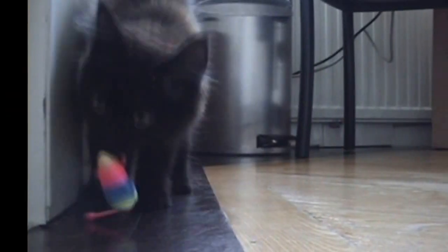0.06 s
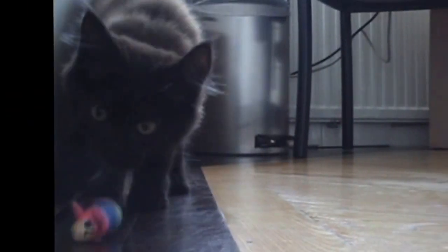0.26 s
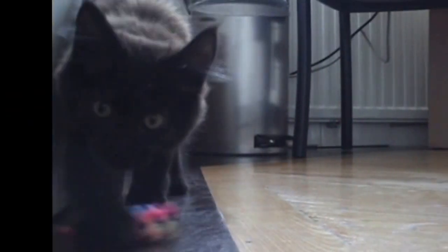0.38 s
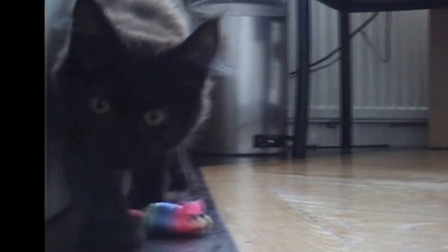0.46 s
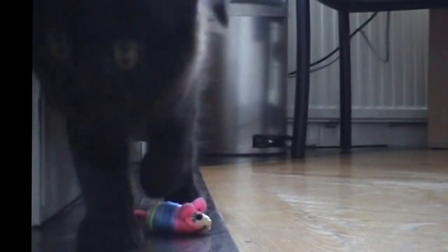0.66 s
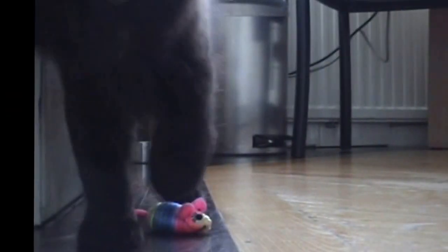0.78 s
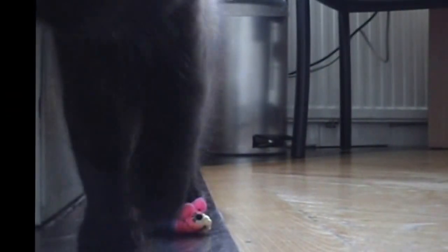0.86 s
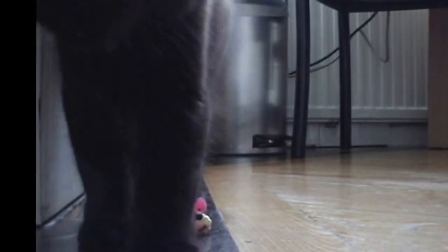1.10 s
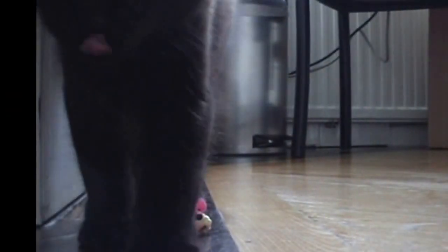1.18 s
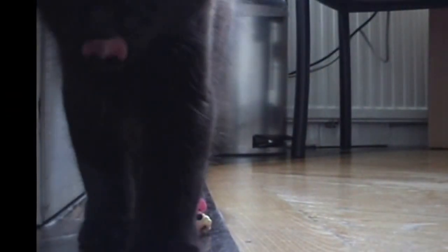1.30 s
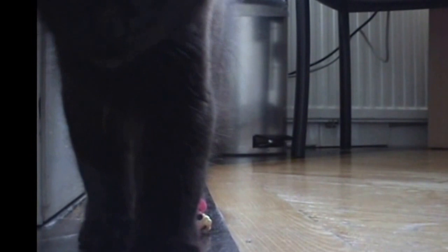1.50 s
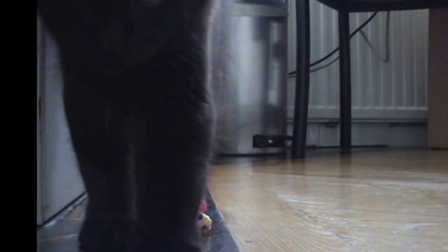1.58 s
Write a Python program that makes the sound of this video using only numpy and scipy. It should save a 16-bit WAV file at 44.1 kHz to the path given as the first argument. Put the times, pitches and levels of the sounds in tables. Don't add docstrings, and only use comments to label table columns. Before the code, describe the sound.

Close to a small hissy microphone, a kitten's plastic bead toy rattles, knocks hard on wood, knocks harder again, scuffs and rolls to rest; afterwards only low wavering hum, faint buzz and barely audible fur brushes.

```python
import sys
import numpy as np
from scipy import signal
from scipy.fft import rfft, irfft
from scipy.io import wavfile
from scipy.ndimage import uniform_filter1d

SR = 44100
rng = np.random.default_rng(int(sys.argv[2]) if len(sys.argv) > 2 else 0)


def decibels_to_gain(level_db):
    exponent = np.asarray(level_db, float) / 20
    return 10 ** exponent


def dump_mix(stems):
    frames = np.atleast_2d(stems).T
    limited = np.clip(frames, -1, 1)
    pcm = np.round(limited * 32767).astype(np.int16)
    wavfile.write(sys.argv[1], SR, pcm)


N = 72765

# pitch_hz, level_db, waver_hz
HUM_TONES = [(49.7, -52, 0.13), (99.74, -53.5, 0.5), (146, -52.5, 1.85), (179.7, -43, 0.29),
             (235.9, -49.5, 5.05), (268, -54, 4.66), (294.4, -54.5, 4.87)]
# time_s, level_db
MAINS_BEAT = [(0, -11), (.06, 1), (.36, 10), (.46, -7), (.8, 5), (1.06, 5.5), (1.3, 3.5), (1.54, -18),
              (1.65, 5)]
# pitch_hz, level_db
BUZZ_SPECTRUM = [(1500, -100), (2900, -92), (4500, -84), (7000, -91), (8700, -107), (11000, -99.5),
                 (14000, -105)]
# pitch_hz, level_db
AIR_SPECTRUM = [(25, -20), (70, -15.5), (160, -2.5), (250, -2), (420, -9), (900, -14.5), (1500, -22),
                (3000, -45)]
# pitch_hz, level_db
HISS_SPECTRUM = [(500, -7), (2000, 9), (4500, 2.5), (7500, -3.5), (10000, -5.5), (12000, -21), (14000, -45),
                 (15700, -27)]
# pitch_hz, likeness_ratio
PORT_LIKENESS = [(60, 0.57), (150, 0.82), (380, 0.73), (950, 0.44), (2380, 0.25), (5980, 0.41),
                 (15000, 0.39)]
# pitch_hz, left_over_right_db
DIFFUSE_LEAN = [(60, -11), (150, 2.5), (380, -2.5), (950, -3.5), (2380, -1), (5980, 0), (15000, -2)]
# time_s, level_db
SLIDE_LEVEL = [(0, -55.5), (.205, -48), (.23, -46.5), (.31, -52), (.45, -46.5), (.57, -52.5), (0.678, -62),
               (0.899, -69), (1.65, -67)]
# pitch_hz, level_db
SLIDE_SPECTRUM = [(200, -9), (500, -0.5), (1000, 0), (2500, -9.5), (5000, -17.5), (9000, -21), (14000, -32)]
# start_s, peak_db, ring_hz
EDGE_SCUFFS = [(.013, -30.5, 568), (.344, -24, 620), (.385, -32, 1650), (.4645, -29.5, 516),
               (.4675, -29.5, 848), (.5285, -32.5, 790), (.534, -35, 1005), (.5385, -40, 694),
               (.543, -36, 517), (.5515, -41.5, 1040), (.5455, -29, 832), (.5495, -34.5, 910),
               (.554, -34, 696), (.562, -31, 480)]
# start_s, belly_db, ring_db, flank_db, tip_db
BEAD_STRIKES = [(0.0579, -43.5, -35, -36, -44.5), (0.0779, -65, -55, -53, -56),
                (0.1049, -43, -48, -35.5, -37), (0.1124, -54, -53, -47, -50),
                (0.1259, -44, -52, -38, -45.5), (0.1537, -51, -50.5, -50.5, -53.5),
                (0.1573, -58, -50, -66, -61), (0.1673, -58, -46, -49, -47), (0.1704, -46, -46, -45, -47),
                (0.2151, -44, -40, -44, -41), (0.2229, -34.5, -35, -33.5, -33.5),
                (0.2309, -62, -65, -50, -50), (0.2336, -62, -52, -47, -49), (0.2532, -53, -44, -48, -62),
                (0.267, -39, -38, -42, -45), (0.2698, -38.5, -40, -36, -40),
                (0.2751, -46, -35.5, -41, -37), (0.2806, -62, -62, -56, -54),
                (0.2833, -61, -63, -59, -57), (0.3001, -47, -37, -41, -36),
                (0.3045, -28.5, -40, -32, -26), (0.3067, -38, -23.5, -25.5, -25),
                (0.3124, -37.5, -34.5, -35, -33.5), (0.3337, -52, -60, -39, -40),
                (0.3729, -35, -30.5, -30, -40), (0.3752, -47, -44, -42, -46),
                (0.3879, -43, -51, -51, -54),
                (0.4182, -53, -43, -43, -40), (0.428, -48, -47, -42, -60), (0.4323, -41, -45, -40, -46),
                  (0.446, -46, -45, -50, -51), (0.4535, -60, -49, -51, -51), (0.4564, -50, -52, -62, -61),
                  (0.4705, -45, -58, -62, -66), (0.477, -50, -57, -58, -62), (0.4972, -45, -52, -63, -64),
                  (0.5168, -53, -48, -39, -54), (0.5299, -50, -57, -34, -48), (0.5313, -48, -55, -48, -59),
                  (0.538, -53, -51, -49, -59), (0.5512, -57, -49, -48, -61), (0.5837, -49, -43, -48, -56),
                  (0.5884, -62, -50, -53, -57.5), (0.5959, -52, -41, -37, -46),
                  (0.6077, -59, -49, -45, -56), (0.6144, -42, -46, -48, -50), (0.6295, -55, -55, -65, -64),
                  (0.6392, -51, -46, -44, -45), (0.6417, -47, -48, -54, -47),
                  (0.6552, -67.5, -62, -58.5, -59), (0.6631, -62, -50, -46, -55),
                  (0.6963, -64, -54, -62, -65), (1.27, -62, -61, -68, -43.5),
                  (1.3573, -50, -56, -62, -53.5)]
# pitch_hz, level_db, t60_s
SHELL_MODES = [(2790, -4.5, 0.0033), (3840, -2.5, 0.0018), (4960, -3.5, 0.0043), (6250, -3, 0.0023),
               (7720, -2.5, 0.0031), (8560, -2.5, 0.0027), (9630, -5.5, 0.0023), (10900, -13.5, 0.0028)]
SHELL_PART_HZ = [3900, 4960, 6300, 8400]
# start_s, peak_db, hardness_db, hollow_ring_db
LANDINGS = [(0.213, -8, -4, -8), (0.2188, -26, 3.5, 0), (0.2338, -29, 6, 4), (0.2543, -32, -5, 0),
            (0.2652, -29, -5, 0), (0.3024, -0.5, 1.5, 6.5), (.308, -21.5, 4, -4), (0.3517, -24, 0.5, 10),
            (0.3626, -11, 0.5, 2), (0.3672, -29, 0, 3), (0.3839, -19.5, 7, 2.5), (.397, -29.5, -4, 2),
            (0.4223, -26.5, 7.5, 0), (0.5294, -33, 5, 0)]
# pitch_hz, level_db, t60_s, signed_gain_ratio
BOARD_MODES = [(210, -20, 0.11, -0.83), (382.5, 3.5, 0.024, 0.98), (523, -25.5, 0.019, -4.5),
               (620, -14.5, 0.056, 0.91), (658, -24, 0.031, 0.55), (965, -15.5, 0.026, -0.5),
               (1330, -23.5, 0.016, 0.94), (2035, -23, 0.0069, 1.5)]
# centre_s, length_s, level_db, centre_hz
FUR_RUSTLES = [
    (0.803, 0.023, -57.5, 4800),
    (1.21, 0.035, -58, 3820),
    (1.414, 0.061, -60, 4300),
    (1.524, 0.028, -57, 4200),
    (1.624, 0.041, -59, 4000),
]
# pitch_hz, t60_s
ROOM_DECAY = [(120, 0.98), (300, 0.32), (800, 0.14), (2000, 0.074), (5000, 0.13), (10000, 0.21)]
# pitch_hz, level_db
ROOM_COLOUR = [(120, 3.5), (230, -4), (390, -5.5), (650, 0.5), (2000, 10.5), (10000, -5)]
# pitch_hz, left_over_right_db
KNOCK_DIRECTION = [(300, -1.3), (600, -3.1), (1200, -0.86), (2500, 0.7)]
# pitch_hz, left_over_right_db
BEAD_DIRECTION = [(3000, 3), (5500, 6.5), (7500, 1), (9000, 2)]


def evened(x):
    return x / np.sqrt(np.mean(x ** 2) + 1e-20)


def read(points, hz):
    f, value = np.transpose(points)
    return np.interp(np.log(hz + 1), np.log(f + 1), value)


def add(mix, start_s, sound):
    part = mix[round(start_s * SR):][:len(sound)]
    part += sound[:len(part)]


def ports_likeness(hz):
    return np.clip(read(PORT_LIKENESS, hz), 0, 1)[:, None]


def diffuse_noise(spectrum, patch_db):
    hz = np.fft.rfftfreq(1024, 1 / SR)
    a, b, c, d, patches = rng.standard_normal((N // 256 + 5, 513, 5)).T
    patches = uniform_filter1d(patches, size=12, axis=0)
    patches = evened(uniform_filter1d(patches, size=10, axis=1))
    same = ports_likeness(hz)
    lean = decibels_to_gain(read(DIFFUSE_LEAN, hz) / 2)[:, None]
    left = a + 1j * b
    right = same * left + np.sqrt(1 - same ** 2) * (c + 1j * d)
    colour = decibels_to_gain(read(spectrum, hz)[:, None] + patch_db * patches)
    z = np.array([left * lean, right / lean]) * colour
    return evened(signal.istft(z, nperseg=1024, noverlap=768)[1][:, :N])


def room(x):
    taps = np.zeros((3, SR // 2))
    at = np.arange(200, SR // 2 - 20, 20) + rng.integers(0, 20, (3, (SR // 2 - 201) // 20))
    np.put_along_axis(taps, at, rng.choice([-1., 1.], at.shape), 1)
    hz, t, z = signal.stft(taps, SR, nperseg=256)
    same = ports_likeness(hz)
    z = np.sqrt(same) * z[2] + np.sqrt(1 - same) * z[:2]
    z = z * decibels_to_gain(read(ROOM_COLOUR, hz)[:, None] - 60 * t / read(ROOM_DECAY, hz)[:, None])
    tail = signal.istft(z, SR, nperseg=256)[1]
    return signal.fftconvolve(x[None], tail / np.linalg.norm(tail[0]), axes=1)[:, :N]


def placed(x, direction, wet_db):
    half_db = read(direction, np.fft.rfftfreq(N, 1 / SR)) / 2
    direct = irfft(rfft(x) * decibels_to_gain(np.array([half_db, -half_db])), N)
    return direct + decibels_to_gain(wet_db) * room(x)


def hum():
    t, out = np.arange(N) / SR, np.zeros(N)
    rates_hz = np.geomspace(.5, 6, 8)[:, None]
    for k, (hz, level_db, waver_hz) in enumerate(HUM_TONES):
        starts = rng.random((2, 8, 1))
        bend, swell = [evened(np.sin(2 * np.pi * (rates_hz * t + p)).sum(0)) for p in starts]
        turns = hz * t + np.cumsum(waver_hz * bend) / SR + rng.random()
        level = level_db + .5 * waver_hz * swell
        if k == 1:
            level = level + np.interp(t, *np.transpose(MAINS_BEAT))
        out += np.sqrt(2) * decibels_to_gain(level) * np.sin(2 * np.pi * turns)
    return out


def buzz():
    bins, field_hz = np.zeros(SR // 2 + 1, complex), 50
    hz = np.arange(field_hz, SR // 2, field_hz)
    level = decibels_to_gain(read(BUZZ_SPECTRUM, hz) + 4.5 * rng.standard_normal(len(hz)))
    bins[hz] = level * np.exp(2j * np.pi * rng.random(len(hz)))
    return np.tile(irfft(bins) * SR / np.sqrt(2), 2)[:N]


def air():
    return decibels_to_gain(-42.5) * diffuse_noise(AIR_SPECTRUM, 2)


def hiss():
    return decibels_to_gain(-57.5) * diffuse_noise(HISS_SPECTRUM, 1.3)


def slide():
    grain = decibels_to_gain(3.0 * evened(uniform_filter1d(rng.standard_normal(N), size=100)))
    level = decibels_to_gain(np.interp(np.arange(N) / SR, *np.transpose(SLIDE_LEVEL)))
    return level * evened(grain) * diffuse_noise(SLIDE_SPECTRUM, 0.91)


def scuffs():
    out, t = np.zeros(N), np.arange(9000) / SR
    t60_s, rise_s, rough = 0.027, 0.00024, .18
    upper_ratio, upper_db = 2.4, -12.5
    for start_s, peak_db, ring_hz in EDGE_SCUFFS:
        jitter = evened(uniform_filter1d(rng.standard_normal(len(t)), size=40))
        turns = np.cumsum(ring_hz * (1 + rough * jitter)) / SR
        ring = np.sin(2 * np.pi * turns) + decibels_to_gain(upper_db) * np.sin(2 * np.pi * upper_ratio * turns)
        add(out, start_s, decibels_to_gain(peak_db - 60 * t / t60_s) * (1 - np.exp(-t / rise_s)) * ring)
    return out


def beads():
    out, t = np.zeros(N), np.arange(500) / SR
    bead_db, rise_s, chatter_s = 12, .00005, .0003
    pitch_spread, colour_db = .022, 1.5
    hz, mode_db, t60_s = np.transpose(SHELL_MODES)[..., None]
    rows = BEAD_STRIKES
    chances = rng.uniform(-1.04, 1, (len(rows), 3, len(SHELL_MODES), 1))
    for (start_s, *parts_db), (detune, colour, delay) in zip(rows, chances):
        late = np.maximum(t - chatter_s * (1 + delay) / 2, 0)
        strike_db = mode_db + colour_db * colour + np.interp(hz, SHELL_PART_HZ, parts_db)
        envelope = (1 - np.exp(-late / rise_s)) * decibels_to_gain(strike_db - 60 * late / t60_s)
        ring = envelope * np.sin(2 * np.pi * hz * (1 + pitch_spread * detune) * late)
        add(out, start_s - chatter_s / 2, decibels_to_gain(bead_db) * ring.sum(0))
    return signal.sosfilt(signal.butter(3, [2200, 14000], "band", fs=SR, output="sos"), out)


def knocks():
    out, t = np.zeros(N), np.arange(9000) / SR
    press_s, knock_db, hard_hz = 0.00094, 3, 450
    damp_after_s, damp_s, damp_db = 0.0094, 0.00044, -9
    joist_hz, joist_db, joist_t60_s, joist_rise_s = 136.7, -20, 0.18, 0.028
    hz, mode_db, t60_s, sign = np.transpose(BOARD_MODES)[..., None]
    hollow = (np.arange(len(BOARD_MODES)) == 5)[:, None]
    muffle = decibels_to_gain(damp_db * np.clip((t - damp_after_s) / damp_s, 0, 1))
    shape = (1 - np.exp(-(t / press_s) ** 2)) * muffle
    joist = (1 - np.exp(-t / joist_rise_s)) * decibels_to_gain(joist_db - 60 * t / joist_t60_s)
    joist = joist * np.sin(2 * np.pi * joist_hz * t)
    for start_s, peak_db, hard_db, hollow_db in LANDINGS:
        strike_db = mode_db + hollow_db * hollow + hard_db * np.log2(hz / hard_hz)
        ring = sign * decibels_to_gain(strike_db - 60 * t / t60_s) * np.sin(2 * np.pi * hz * t)
        add(out, start_s, decibels_to_gain(peak_db + knock_db) * (shape * ring.sum(0) + decibels_to_gain(peak_db) * joist))
    return out


def jolt():
    out, t = np.zeros(N), np.arange(9000) / SR
    hardest = max(LANDINGS, key=lambda row: row[1])
    add(out, hardest[0], decibels_to_gain(-32 - 60 * t / 0.11) * np.sin(2 * np.pi * 32 * t))
    return out


def rustles():
    out, width = np.zeros(N), 0.26
    for centre_s, length_s, level_db, hz in FUR_RUSTLES:
        band = signal.butter(1, [hz * (1 - width), hz * (1 + width)], "band", fs=SR)
        puff = evened(signal.lfilter(*band, rng.standard_normal(SR // 5)))[:round(length_s * SR)]
        add(out, centre_s - length_s / 2, decibels_to_gain(level_db) * np.hanning(len(puff)) * puff)
    return out


def scene():
    background = hum() + buzz() + air() + hiss()
    low_cut = signal.butter(2, 112, "high", fs=SR, output="sos")
    body = signal.sosfilt(low_cut, scuffs() + knocks())
    toy = placed(body, KNOCK_DIRECTION, -13.5) + placed(beads(), BEAD_DIRECTION, -12.5)
    return background + slide() + toy + jolt() + rustles()


def gate(x):
    hz, t, z = signal.stft(x, SR, nperseg=1024)
    power = uniform_filter1d((abs(z) ** 2).mean(0), size=5, axis=0)
    power = uniform_filter1d(power, size=3, axis=1)
    usual = np.median(power, axis=1)[:, None]
    weak = (power < decibels_to_gain(2 * -1.8) * usual) & (hz[:, None] > 12800)
    return signal.istft(z * decibels_to_gain(-25 * weak), SR, nperseg=1024)[1][:, :N]


def low_pass(x):
    return signal.sosfilt(signal.butter(12, 17060, fs=SR, output="sos"), x)


def record(dry):
    bend, ceiling = .04, 1.08
    fold_hz, fold_db, edge_hz = 16000, -35.5, 15745
    bent = ceiling * np.tanh(np.sinh(dry + bend * dry ** 2) / ceiling)
    mirror = decibels_to_gain(fold_db) * 2 * np.cos(2 * np.pi * fold_hz * np.arange(N) / SR)
    folded = bent * (1 + mirror)
    band_edge = signal.firwin(2047, edge_hz, window=("kaiser", 9), fs=SR)
    mix = gate(signal.oaconvolve(folded, band_edge[None], "same"))
    return low_pass(mix)


dry = scene()
out = record(dry)
dump_mix(out)
```